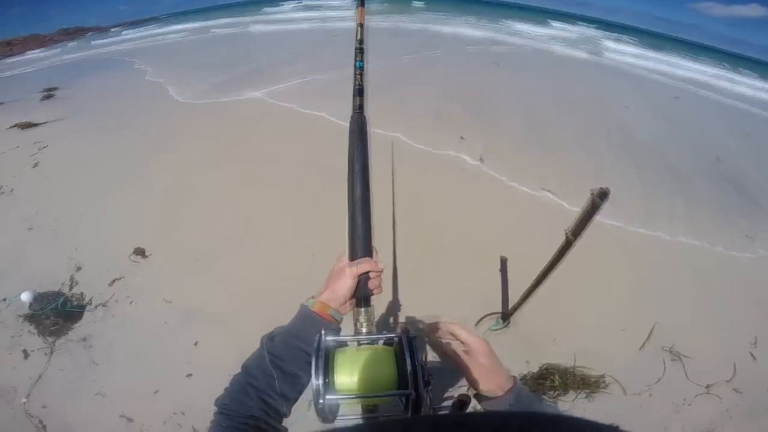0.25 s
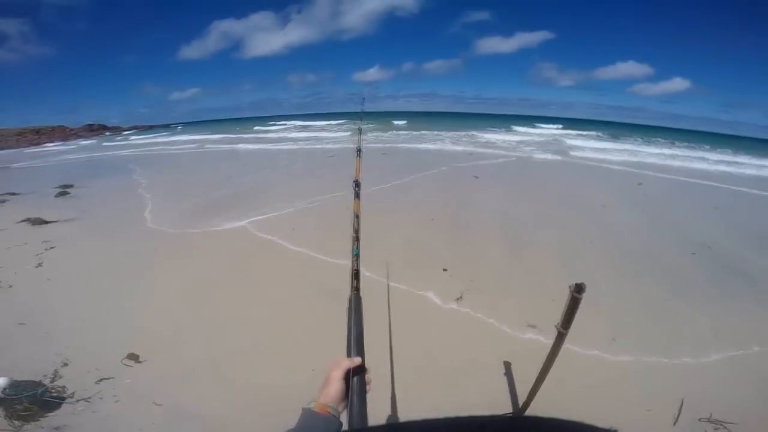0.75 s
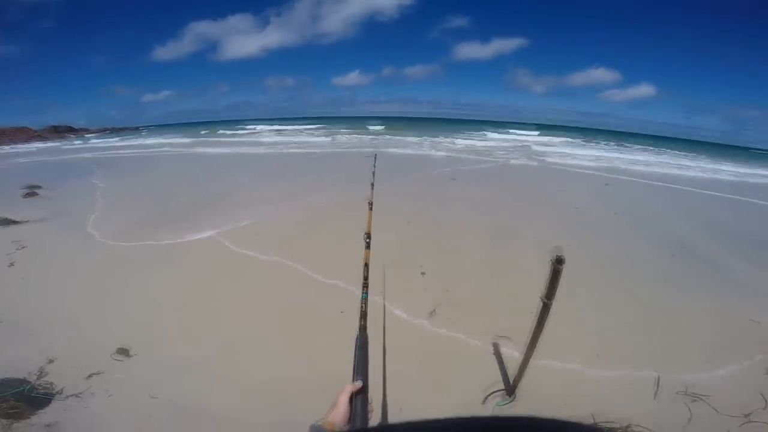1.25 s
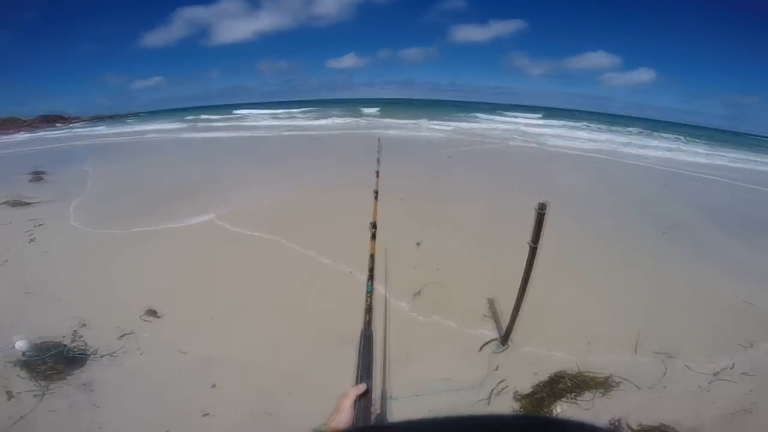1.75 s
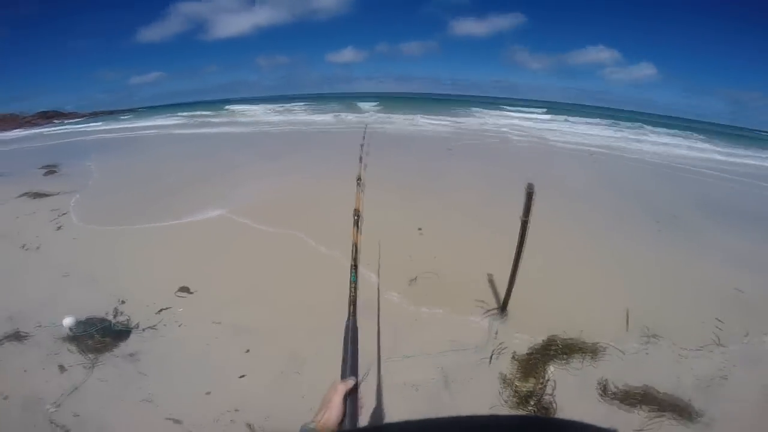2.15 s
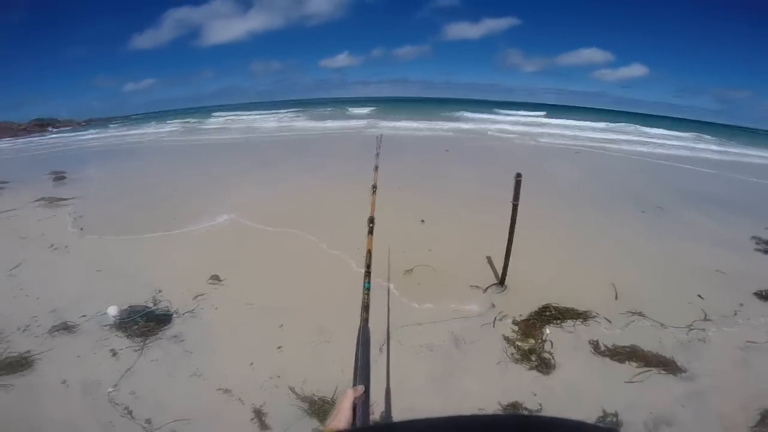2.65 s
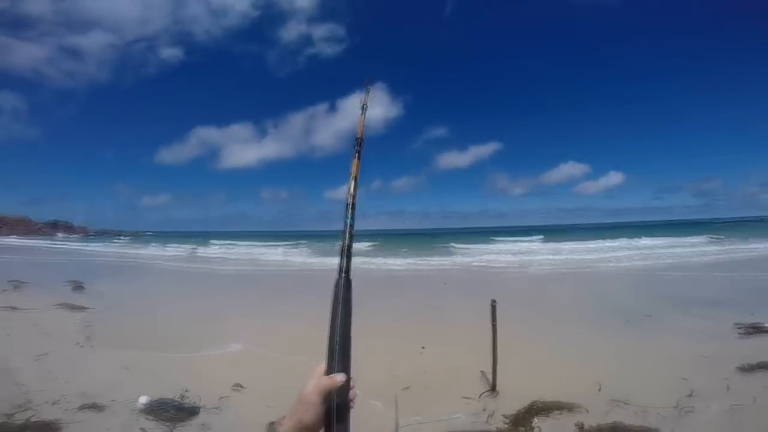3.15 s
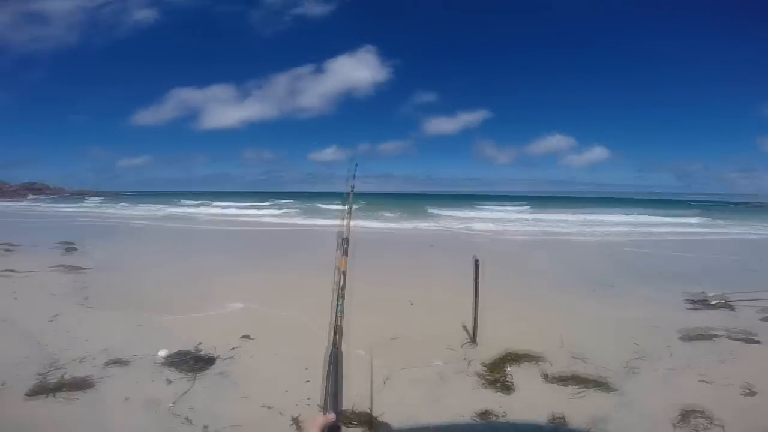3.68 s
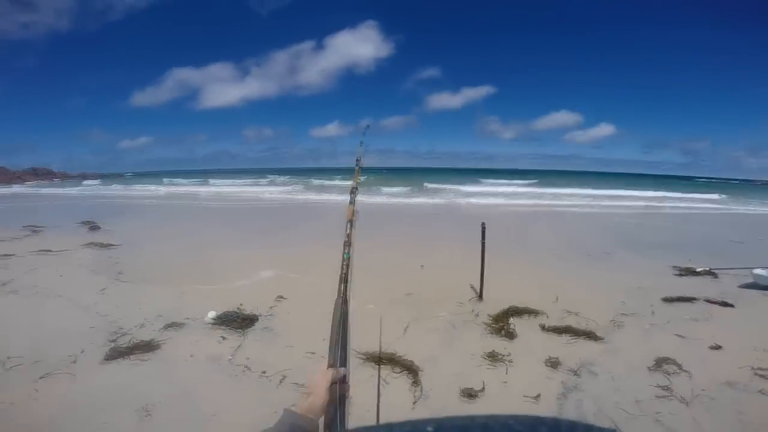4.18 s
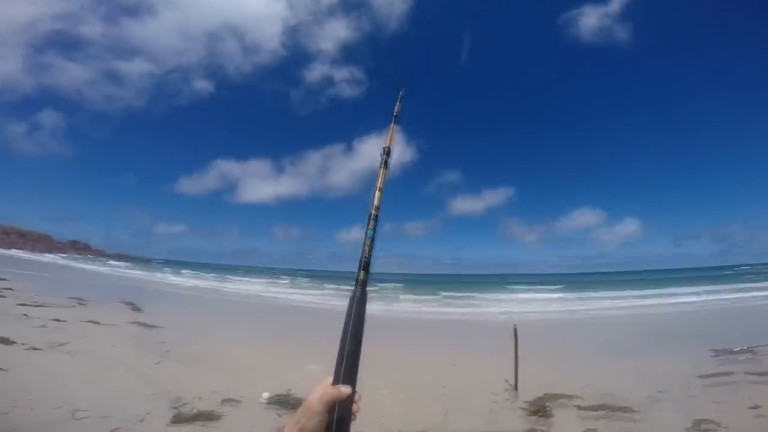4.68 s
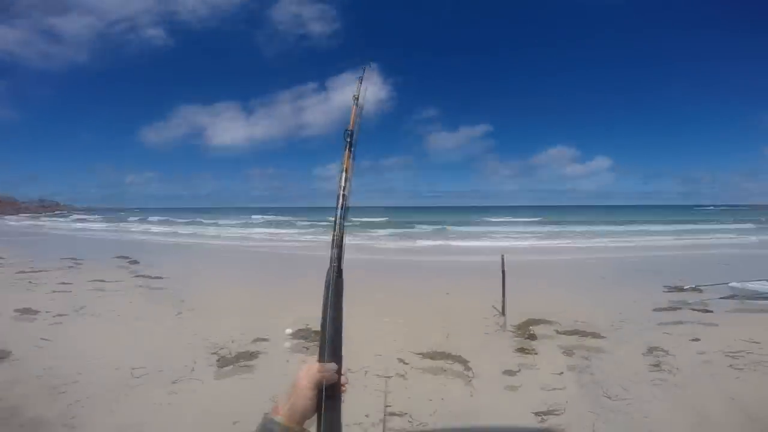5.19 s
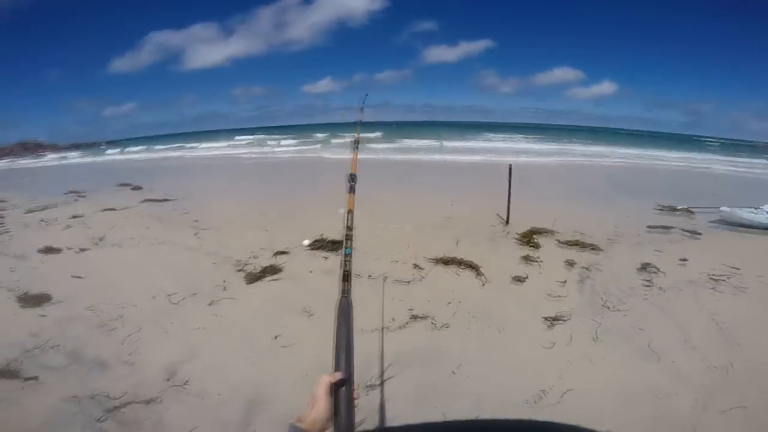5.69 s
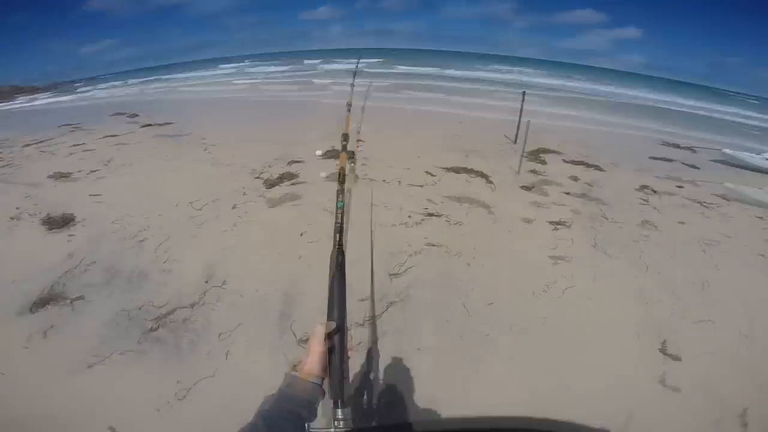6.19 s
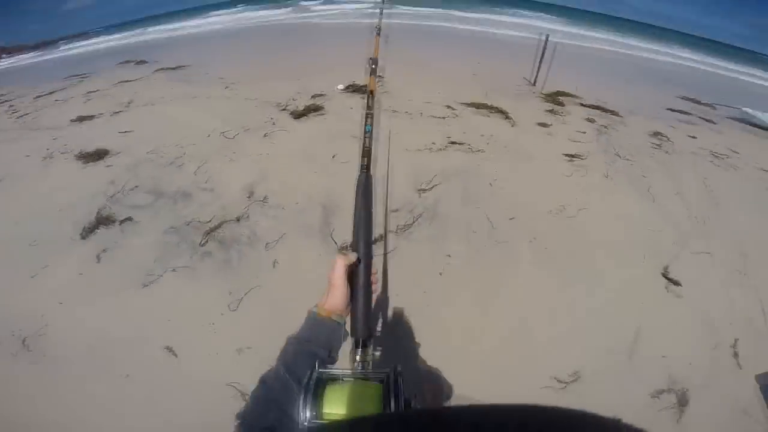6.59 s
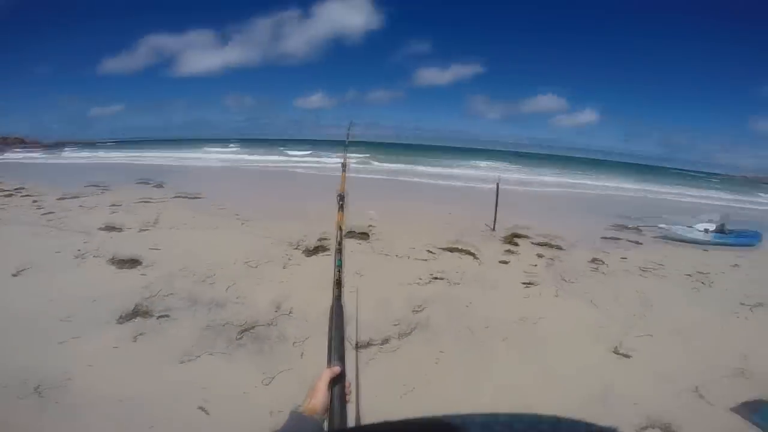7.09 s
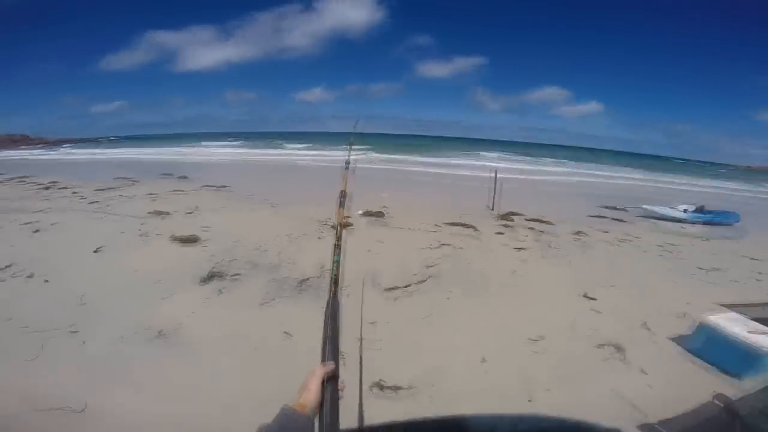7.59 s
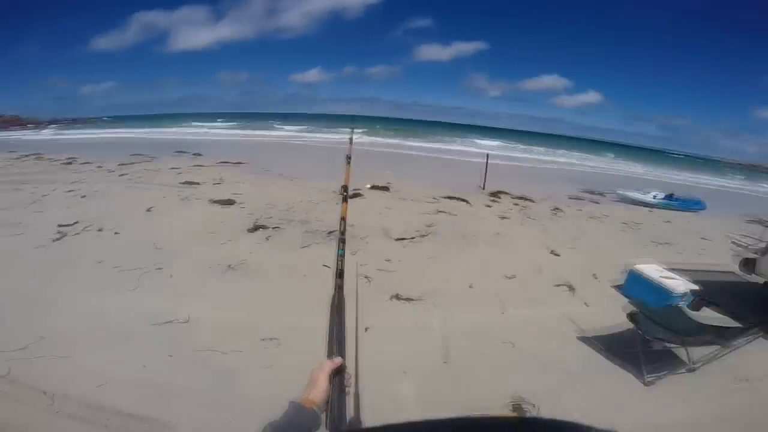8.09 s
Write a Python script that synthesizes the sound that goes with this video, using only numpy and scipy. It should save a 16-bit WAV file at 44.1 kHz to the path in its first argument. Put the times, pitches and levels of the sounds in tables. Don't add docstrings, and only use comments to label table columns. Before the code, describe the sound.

Close, boxy sound from a microphone sealed in a plastic case on an angler on a windy beach. A large reel is already whirring at 0 s, a bright, pitched buzz of about 180 clicks per second, slowing slightly and stopping abruptly near 0.28 s with a hard tick. Small ticks, faint rubbing and a brief wash of surf fill the gap. From 0.84 to 3.16 s the clicker ratchets harsher and woodier, surging with each tug, with knocks from 1.6 s. A short pause has rubs and ticks; clicking resumes 3.4-4.35 s, with a strong knock at 3.87. In the next gap come a sharp snap, strap rubs and a deep wind thump around 4.5-4.6 s. The last run, 5.16 s to the end, pulses steadily, with heavy knocks at 6.2, 6.3 and 7.8 s and a loud rub at 6.85. Wind flutters throughout; distant surf hisses quietly.

```python
import sys
import numpy as np
from scipy import signal
from scipy.fft import rfft, irfft
from scipy.io import wavfile
from scipy.ndimage import uniform_filter1d

SR = 44100
rng = np.random.default_rng(int(sys.argv[2]) if len(sys.argv) > 2 else 0)


def file_out(sig):
    cols = np.atleast_2d(sig).T
    lim = np.clip(cols, -1, 1)
    pcm = np.round(lim * 32767).astype(np.int16)
    wavfile.write(sys.argv[1], SR, pcm)


def elevation(decibels):
    levels = np.asarray(decibels, float)
    return 10 ** (levels / 20)


N = 367794

# (time [s], slack speed [teeth/s], teeth until next slack [count], spin-up [s])
TUG_CYCLES = [(0.839, 38, 15, 0.18), (1.099, 58, 14, 0.14), (1.295, 49, 25, 0.03), (1.556, 69, 30, 0.09),
              (1.836, 68, 26, 0.07), (2.074, 60, 28, 0.1), (2.344, 57, 14, 0.12), (2.493, 68, 13, 0.11),
              (2.645, 64, 23, 0.08), (2.895, 74, 22, 0.07), (3.159, 52, 0, 0), (3.4, 45, 14, 0.09),
              (3.59, 47, 28, 0.08), (3.857, 46, 27, 0.07), (4.124, 42, 21, 0.06), (4.353, 53, 0, 0),
              (5.161, 58, 7, 0.25), (5.273, 51, 27, 0.1), (5.578, 32, 9, 0.25), (5.709, 63, 21, 0.13),
              (5.951, 66, 27, 0.07), (6.191, 45, 26, 0.04), (6.428, 52, 29, 0.1), (6.705, 51, 27, 0.07),
              (6.976, 40, 26, 0.09), (7.246, 57, 30, 0.1), (7.583, 31, 27, 0.17), (7.917, 34, 29, 0.16),
              (8.237, 32, 24, 0.14), (8.49, 40, 0, 0)]


def in_time(rows):
    s, *columns = np.transpose(rows)
    return [np.interp(np.arange(N) / SR, s, c) for c in columns]


def rms_one(x):
    return x / np.sqrt(np.mean(x ** 2) + 1e-20)


def drift(rate_hz):
    r = np.exp(-2 * np.pi * rate_hz / SR)
    noise = rng.standard_normal(N + SR)
    return rms_one(signal.lfilter([1], [1, -2 * r, r * r], noise)[SR:])


def ring(force, hz, width_hz):
    r, w = np.exp(-np.pi * width_hz / SR), 2 * np.pi * hz / SR
    rung = signal.lfilter([0, np.sin(w)], [1, -2 * r * np.cos(w), r * r], force + 1e-18)
    return np.sqrt(width_hz / 100) * rung


def body(force, modes):
    return sum((-1) ** k * elevation(db) * ring(force, hz, width) for k, (hz, width, db) in enumerate(modes))


def coloured(spectrum):
    hz = np.maximum(np.fft.rfftfreq(N, 1 / SR), 1)
    knot_hz, knot_db = np.array(spectrum).T
    shape_db = np.interp(np.log(hz), np.log(knot_hz), knot_db, -80, -80)
    return rms_one(irfft(rfft(rng.standard_normal(N)) * elevation(shape_db), N))


def struck(times, sizes, contact_s):
    force = np.zeros(N)
    np.add.at(force, np.minimum((np.asarray(times) * SR).astype(int), N - 1), sizes)
    pulse = np.sin(np.linspace(0, np.pi, int(contact_s * SR) + 3))
    return signal.lfilter(pulse / pulse.sum(), [1], force)


def surf():
    # (frequency [Hz], density [dB/Hz])
    breaker_spectrum = [(250, -3), (500, 0.5), (900, -5), (1500, -2.5), (2900, 0.5), (3500, -6),
                        (4700, -15), (5300, -7.5), (5750, -11.5), (6250, -6.5), (7200, -19.5),
                        (9000, -22.5), (15500, -31)]
    # (frequency [Hz], density [dB/Hz])
    wash_spectrum = [(6000, -30), (7500, 2), (10000, -1), (13000, -5), (15000, -20)]
    surf_db, wash_db, wash_at_s, wash_length_s = -52, -68, 0.64, 0.14
    wash_gain = elevation(wash_db) * np.exp(-((np.arange(N) / SR - wash_at_s) / wash_length_s) ** 2)
    breakers = elevation(surf_db + 0.4 * drift(1.0)) * coloured(breaker_spectrum)
    return breakers + wash_gain * coloured(wash_spectrum)


def wind():
    # (time [s], thump level [dB], flutter level [dB])
    gusts = [(0.28, -59, -48), (0.66, -37, -65), (0.88, -34, -51), (1.58, -21, -38), (1.69, -24, -49),
             (1.98, -28, -54), (2.2, -25, -37), (2.4, -37, -47), (2.63, -27, -61), (2.86, -42, -57),
             (3.02, -32, -45), (3.35, -30, -44), (3.5, -31, -48), (3.82, -31.5, -32), (4.0, -25, -27.5),
             (4.3, -35, -71), (4.598, -12.5, -41), (4.75, -31, -62), (5.42, -26, -40), (5.67, -45, -50),
             (6.07, -37.5, -63.5), (6.37, -23, -33), (6.47, -22, -31), (6.8, -35, -32.5), (7.11, -30, -63),
             (7.301, -22, -28), (7.45, -29, -38), (7.85, -23, -31), (8.09, -41, -30), (8.23, -44, -62)]
    # (frequency [Hz], density [dB/Hz])
    thump_spectrum = [(9, 13), (14, 1.5), (25, -0.5), (40, -10), (62, -22), (90, -26.5), (150, -35)]
    # (frequency [Hz], density [dB/Hz])
    flutter_spectrum = [(26, -29), (45, 9), (113, -4), (242, 3), (299, 0), (397, -16), (443, -14),
                        (500, -22.5), (650, -15), (1100, -120)]
    gust_s, calm_thump_db, calm_flutter_db = 0.052, -30.5, -50
    s, thump_db, flutter_db = np.transpose(gusts)
    coarse = np.arange(0, N, 200)
    swell = np.exp(-((coarse[:, None] / SR - s) / gust_s) ** 2)
    thump_gain = np.interp(np.arange(N), coarse, elevation(calm_thump_db) + swell @ elevation(thump_db))
    flutter_gain = np.interp(np.arange(N), coarse, elevation(calm_flutter_db) + swell @ elevation(flutter_db - 8.5))
    thump = coloured(thump_spectrum)
    flutter = coloured(flutter_spectrum) * elevation(3.3 * drift(17.7))
    return thump_gain * thump + flutter_gain * rms_one(flutter)


def rubs(grains_per_s=4000):
    # (start [s], peak level [dB], hold [s], fade [dB/s])
    strokes = [(0.303, -60, .005, 700), (0.342, -52, .005, 310), (0.414, -52, .003, 2500),
               (0.547, -63, .07, 200), (3.147, -38, 0.0057, 300), (3.336, -49, 0.011, 400),
               (4.485, -45, 0.009, 800), (4.516, -45, 0.018, 900), (4.563, -44.5, 0.0093, 700),
               (4.609, -49, 0.015, 2000), (4.72, -56, .07, 500), (4.839, -46, .03, 600),
               (6.853, -24, 0.021, 3000)]
    # (frequency [Hz], width [Hz], level [dB])
    rub_modes = [(1870, 350, 1), (2600, 220, 4), (2660, 830, 5.5)]
    rise_db_per_s, longest_s = 1500, 0.047
    sizes = elevation(1.6 * np.minimum(rng.exponential(1, N), 3))
    grains = (rng.random(N) < grains_per_s / SR) * sizes * rng.choice([-1, 1], N)
    t, level = np.arange(N) / SR, 0
    for s, db, hold_s, fade_db_per_s in strokes:
        loss_db = rise_db_per_s * np.maximum(s - t, 0) + fade_db_per_s * np.maximum(t - s - hold_s, 0)
        level = level + elevation(db - np.minimum(loss_db, 100)) * (t < s + longest_s)
    band = signal.butter(2, [900, 3300], "band", fs=SR, output="sos")
    rasp = signal.sosfilt(band, body(grains, rub_modes))
    return level * rms_one(rasp) * elevation(2 * drift(59))


def ticks():
    # (time [s], peak level [dB], pitch [Hz])
    tiny_contacts = [
        (0.2665, -17, 2300),
        (0.2684, -12.5, 3150),
        (0.2668, -22, 3900),
        (0.3433, -31, 1650),
        (0.415, -31, 2030),
        (0.607, -34, 1930),
        (3.1813, -26, 1910),
        (3.264, -33, 1560),
        (3.2853, -23.5, 2500),
        (4.841, -26, 1760),
                     (3.223, -31, 6520),
        (4.4879, -18, 6500),
    ]
    out = np.zeros(N)
    for s, db, hz in tiny_contacts:
        out += ring(ring(struck([s], elevation(db - 35), 0), hz, hz / 4), hz, hz / 4)
    return out


def knocks():
    # (time [s], peak level [dB], low push re peak [dB], crack re peak [dB])
    blows = [(1.571, -19.5, -11, -0.5), (1.67, -22, -6, -0.5), (1.931, -26, -8, 2),
             (2.209, -16, -5.5, -0.5), (2.471, -20.5, -6, 1.5), (3.143, -30, -21, -6), (3.203, -33, -1, -8),
             (3.522, -24, -6.5, 4.5), (3.59, -31, -1.5, 6), (3.868, -11.5, -12, -0.5), (3.943, -29, -12, 6),
             (4.003, -18, -3, 2.5), (4.054, -21, -18, -14), (4.523, -28.5, -2, -10),
             (4.838, -33.5, -6, 0.5), (5.644, -25.5, -7.5, -14), (6.209, -6.5, -10, 0),
             (6.327, -9.5, -7, 4.5), (6.413, -35, -2, -22), (6.459, -18, -7.5, -5), (6.518, -26, -6, -2),
             (6.605, -24, -16, 4), (6.787, -36, -5, 14), (7.303, -23, -33, -15), (7.438, -23.5, -6.5, 0),
             (7.591, -29.5, -5.5, -17), (7.828, -11.5, -13.5, 5.5), (8.067, -17, -3.5, 3.5),
             (8.102, -15, -17, -21), (8.306, -26.5, -10, -2)]
    # (time [s], peak level [dB])
    nudges = [
        (1.306, -50),
        (3.286, -36),
        (3.703, -34),
        (4.119, -36.5),
        (5.4, -31),
        (6.708, -32),
        (8.179, -43),
    ]
    # (frequency [Hz], width [Hz], level [dB])
    thud_modes = [(243.5, 74, 4.5), (402, 410, 4.5), (670, 870, 6), (905, 174, 1)]
    # (frequency [Hz], width [Hz], level [dB])
    push_modes = [(54.4, 18.5, 3), (161, 42, -4), (83, 64, 0)]
    # (frequency [Hz], width [Hz], level [dB])
    crack_modes = [(1456, 62, -5), (2243, 230, -2.5), (2780, 390, -7)]
    nudge_push_db, nudge_crack_db = 1, -15
    touches = [(s, db, nudge_push_db, nudge_crack_db) for s, db in nudges]
    s, peak_db, push_db, crack_db = np.transpose(blows + touches)
    thud = body(struck(s, elevation(peak_db - 1), 0.00064), thud_modes)
    swing_s, edge_s, bounce_s = .006, .0002, 0.001408
    push = body(struck(s + .002, -elevation(peak_db + push_db + 11), swing_s), push_modes)
    edge = elevation(peak_db + crack_db + 3.5)
    edge_force = struck(s, -edge, edge_s) + struck(s + bounce_s, .5 * edge, edge_s)
    crack = body(edge_force, crack_modes)
    return thud + push + signal.sosfilt(signal.butter(2, 3500, fs=SR, output="sos"), crack)


def spool():
    # (time [s], speed [teeth/s])
    free_run = [
        (0.0025, 187.0),
        (0.07, 180.3),
        (0.2, 170.7),
        (0.266, 166.0),
        (0.274, 130),
        (0.284, 80),
    ]
    slow_down_s, mid_sag = .07, .15
    t = np.arange(N + SR) / SR
    speed = np.interp(t, *np.transpose(free_run), 0, 0)
    for (start, slack, teeth, spin_up_s), (end, slack_next, *_) in zip(TUG_CYCLES, TUG_CYCLES[1:]):
        span = slice(int(start * SR), int(end * SR))
        share = (t[span] - start) / (end - start)
        up = np.clip((t[span] - start) / (spin_up_s + 1e-9), 0, 1)
        down = np.clip((end - t[span]) / slow_down_s, 0, 1)
        pull = (np.sin(up * np.pi / 2) * np.sin(down * np.pi / 2)) ** 2
        pull = pull * (1 - mid_sag * np.sin(share * np.pi) ** 4)
        base = slack + (slack_next - slack) * share
        speed[span] = (base + pull * (teeth * SR - base.sum()) / pull.sum()) * (teeth > 0)
    return speed[:N]


def tooth_times(speed):
    passed = np.cumsum(speed) / SR
    tugged = np.arange(N) > TUG_CYCLES[0][0] * SR
    to_midway = (.5 - passed[~tugged][-1]) % 1
    passed = np.where(tugged, passed + to_midway, passed + 1 - 1e-4)
    return np.flatnonzero(np.diff(np.floor(passed), prepend=0) > 0) / SR


def chatter(hits, hz, length_s, fresh, tail):
    t = np.arange(int(.045 * SR)) / SR
    shape = (1 - np.exp(-t / 0.00022)) * np.exp(-t / length_s)
    burst = (2 * shape * np.cos(2 * np.pi * hz * t) / shape.sum())[t < .012]
    same = signal.oaconvolve(hits * np.sqrt(1 - fresh), burst)[:N]
    envelope = shape + tail * shape.max() * np.exp(-t / .011)
    envelope = envelope / np.sqrt(np.sum(shape ** 2))
    loose = signal.oaconvolve(hits * np.sqrt(fresh), envelope)[:N]
    return same + loose * rng.standard_normal(N)


def clicker(uneven_db=-1.1):
    # (time [s], air path level [dB], rod path level [dB], side plate level [dB])
    path_levels = [(0.0, -32, -40.5, -52), (0.25, -32.5, -45, -48), (0.28, -32, -41, -51),
                   (0.9, -44, -47, -37), (1.2, -43, -40.5, -36), (1.45, -42, -35, -38),
                   (2.42, -41.5, -33.5, -40.5), (3.15, -42, -37.5, -36), (3.45, -39.5, -34.5, -38),
                   (3.6, -42.5, -32, -40.5), (4.28, -42, -33, -38), (4.35, -38.5, -45, -39),
                   (5.2, -39.5, -32, -45), (5.44, -39, -31.5, -42), (5.64, -43, -32, -39.5),
                   (6.64, -35.5, -32, -41), (6.92, -41, -32.5, -41), (8.34, -42, -33, -35)]
    # (frequency [Hz], width [Hz], level [dB])
    air_modes = [(2822, 170, 3.5), (3050, 100, 2), (3285, 88, -2.5), (3690, 108, 2.5), (4094, 170, 2.5),
                 (4430, 120, -2), (5345, 250, 5), (6227, 290, 7.5), (6580, 360, -2)]
    # (frequency [Hz], width [Hz], level [dB])
    rod_modes = [(1234, 92, -2.5), (1607, 176, 9), (1803, 66, 3), (2162, 480, 5.5), (2363, 81, 2.5),
                 (2621, 48, 1.5)]
    # (frequency [Hz], width [Hz], level [dB])
    top_modes = [(7260, 280, 4.5), (8260, 340, 6.5), (9330, 760, 9.5), (9890, 260, 4.5), (10900, 1700, 6.5),
                 (12000, 220, -6), (13100, 180, -5.5), (15060, 350, 8.5)]
    # (frequency [Hz], width [Hz], level [dB])
    plate_modes = [(1009.5, 35, 6.5), (951, 47, -2), (1115, 91, 3), (985.7, 35, 1)]
    # (frequency [Hz], width [Hz], level [dB])
    sheen_modes = [(13200, 1000, -6.5), (1950, 120, -4), (2520, 230, -3), (900, 44, -12)]
    top_re_air_db, sheen_db, sheen_growth, grip_swell_db = -12, -60, 3.5, 1.5

    speed = spool()
    drops = tooth_times(speed)
    luck = rng.standard_normal((len(drops), 2))
    air_db, rod_db, plate_db = in_time(path_levels)
    rod_db = rod_db + grip_swell_db * drift(11.3)
    speed = np.maximum(speed, 30)
    per_click = (speed / 100) ** -.15
    late_teeth = (.004 + .014 * (drops > TUG_CYCLES[0][0])) * luck[:, 0]
    late_s = late_teeth / speed[(drops * SR).astype(int)]
    hits = struck(drops + late_s, elevation(uneven_db * luck[:, 1]), 0) * per_click
    last = np.searchsorted(drops, np.arange(N) / SR + .001) - 1
    # (modes, path dB, rattle s, fresh share, tail, tooth spread dB, wander dB)
    paths = [(air_modes, air_db, .0016, .3, .36, 1.2, 2.5),
             (rod_modes, rod_db, .0008, .18, .15, 1.0, 1.8),
             (top_modes, air_db + top_re_air_db, .0016, .75, .2, 1.5, .8),
             (plate_modes, plate_db, .0004, .08, .05, .7, 1.0),
             (sheen_modes, sheen_db + sheen_growth * (air_db + 41), .0013, .4, .16, 1.5, .8)]
    loose = np.clip((185 - speed) / 85, .25, 1)
    out, at = np.zeros(N), np.flatnonzero(hits)
    for modes, path_db, length_s, fresh, tail, spread_db, wander_db in paths:
        for k, (hz, width, db) in enumerate(modes):
            chance = rng.standard_normal((2, len(drops)))
            wander = rms_one(uniform_filter1d(chance[1], size=8))
            strength = elevation(spread_db * chance[0] + wander_db * wander)[last[at]]
            force = np.zeros(N)
            force[at] = hits[at] * strength ** loose[at] * elevation(db + path_db[at] - 3.5)
            rattle = chatter(force, hz, length_s, fresh * loose, tail)
            out += (-1) ** k * ring(rattle, hz, width)
    return signal.sosfilt(signal.butter(8, 840, "high", fs=SR, output="sos"), out)


def scene():
    return (surf() + wind() + rubs() + ticks() + knocks() + clicker())[None]


def low_pass(x):
    return signal.sosfilt(signal.butter(12, 15840, fs=SR, output="sos"), x)


def record(dry):
    full_scale, cutoff_hz = 2.7, 15900
    x = full_scale * np.tanh(dry / full_scale)
    x = signal.sosfilt(signal.cheby2(12, 70, cutoff_hz, fs=SR, output="sos"), x)
    x = signal.sosfilt(signal.butter(2, 13, "high", fs=SR, output="sos"), x)
    return low_pass(x)


dry = scene()
out = record(dry)
file_out(out)
```